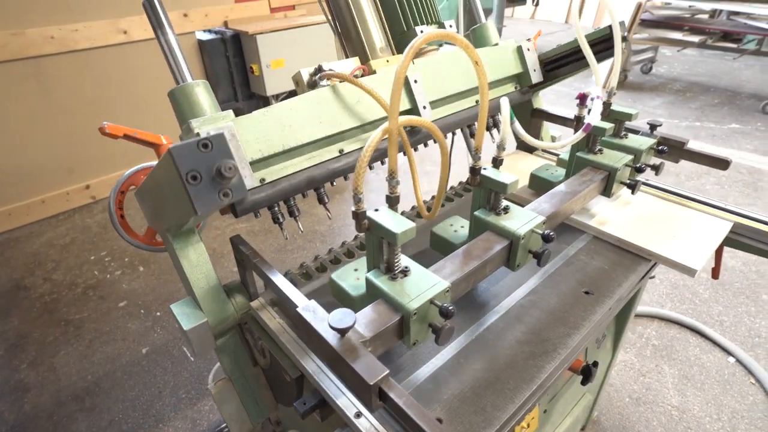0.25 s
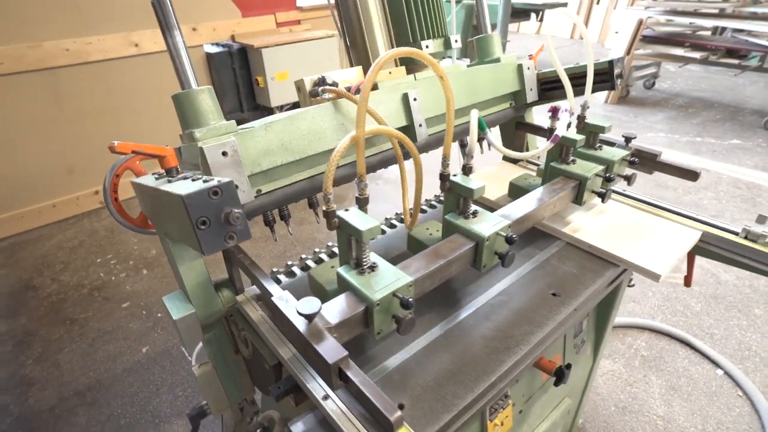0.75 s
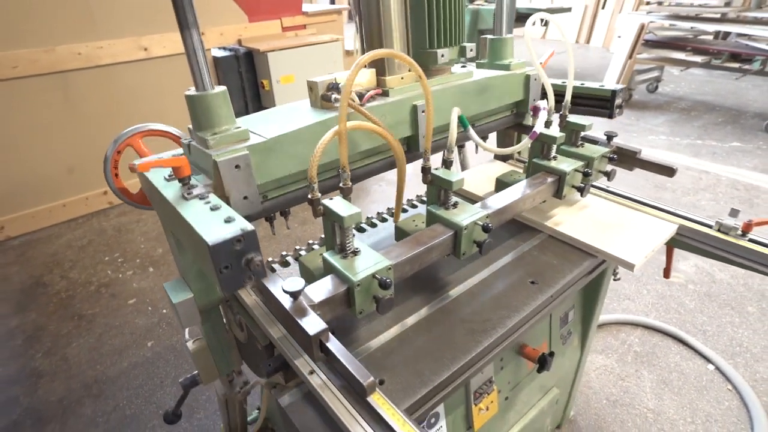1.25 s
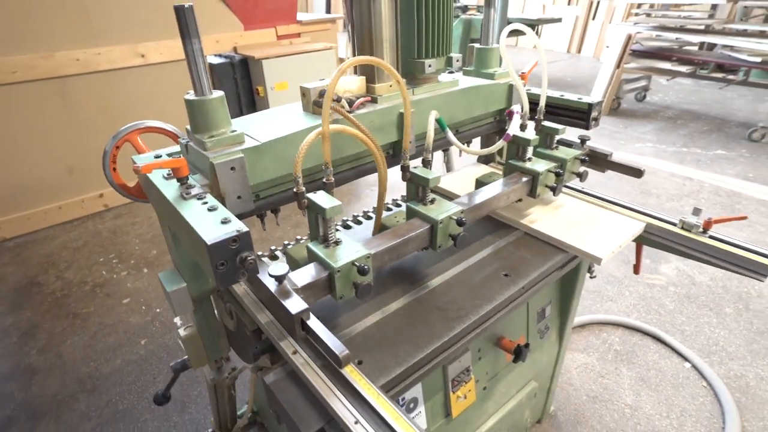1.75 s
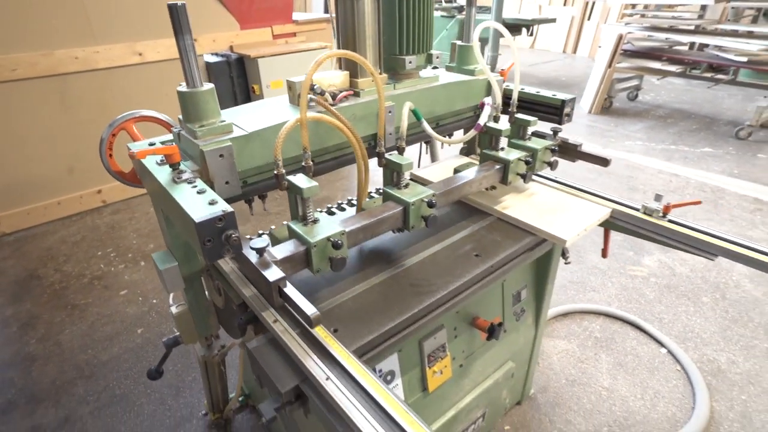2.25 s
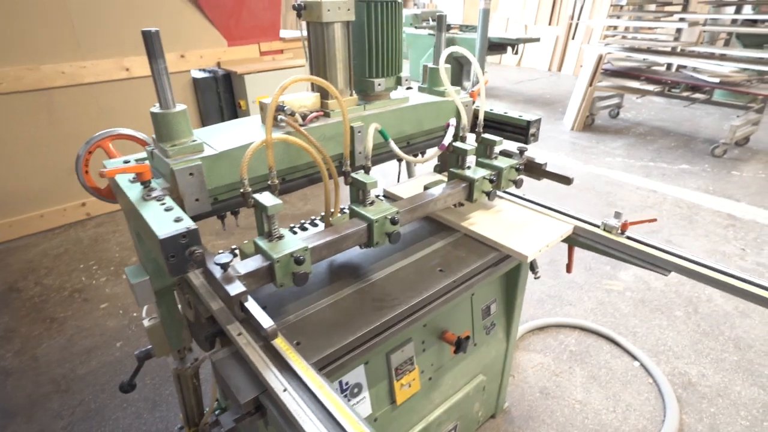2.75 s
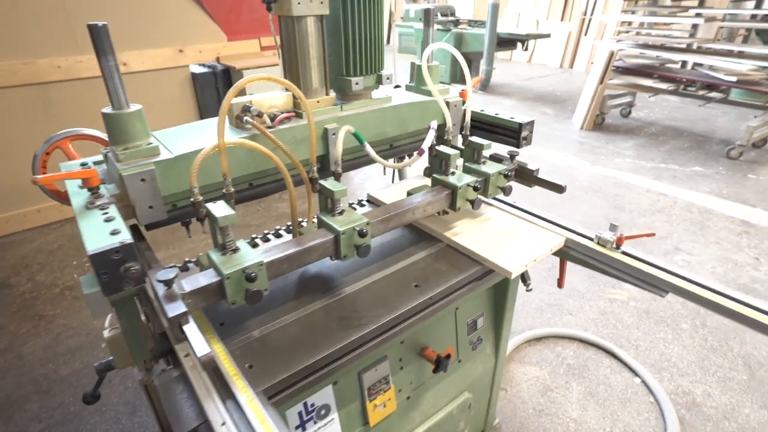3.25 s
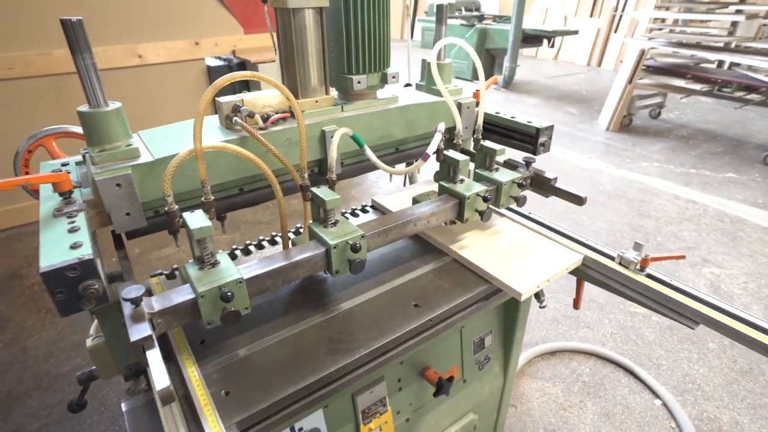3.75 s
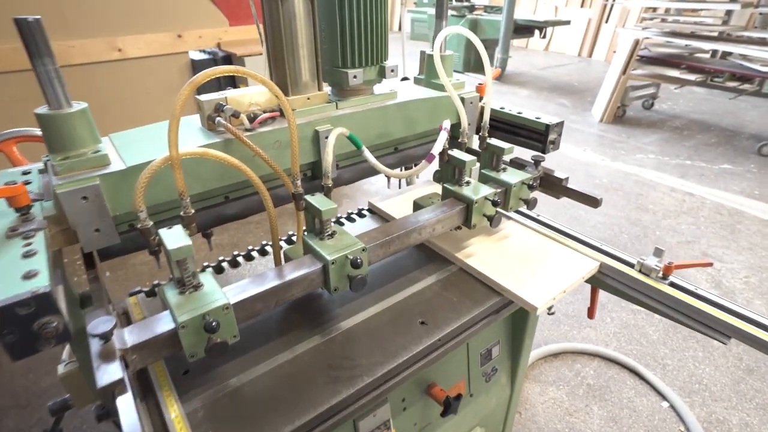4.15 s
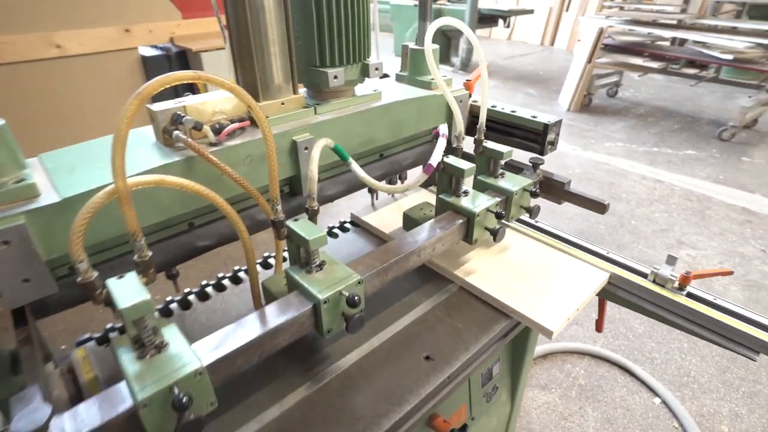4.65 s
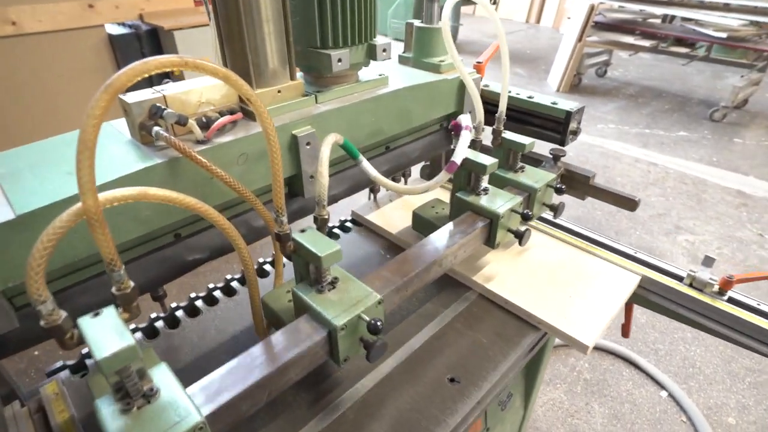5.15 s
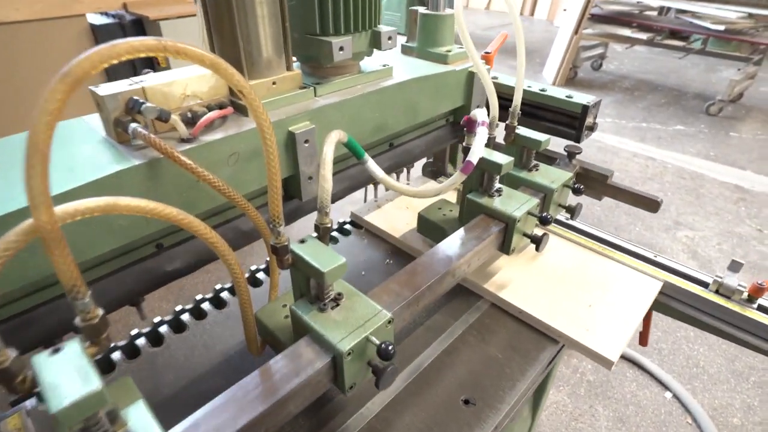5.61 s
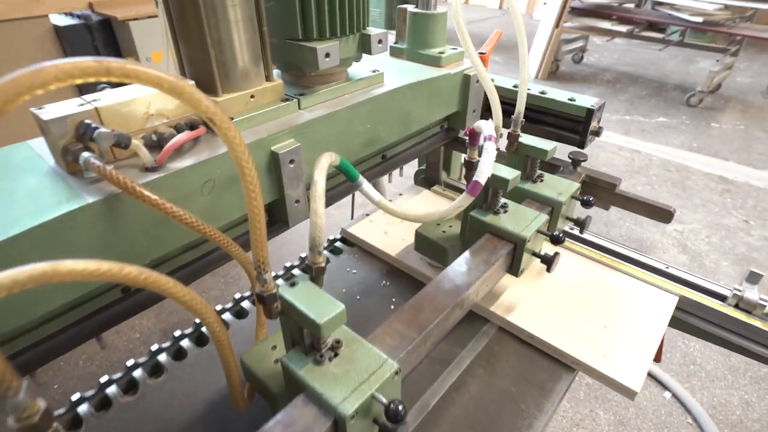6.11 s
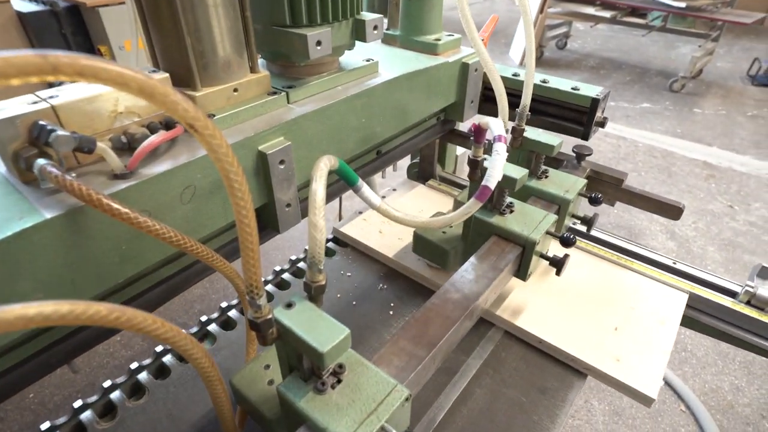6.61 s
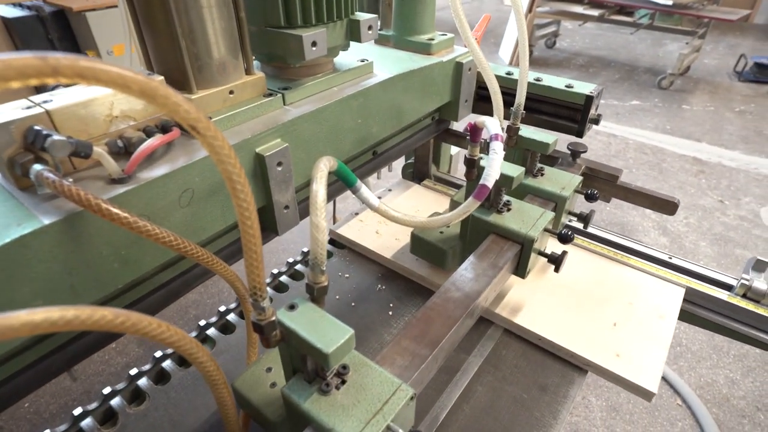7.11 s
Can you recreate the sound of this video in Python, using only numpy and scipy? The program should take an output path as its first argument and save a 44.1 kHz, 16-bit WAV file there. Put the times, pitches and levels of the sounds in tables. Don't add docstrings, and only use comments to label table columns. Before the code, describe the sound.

A quiet, roomy workshop, heard in close stereo. From 0 s a compressor throbs low with chattering casing, small belt squeaks and a thin air leak, fading after about 1.2 s. A ringing valve clack lands at 0.9 s, a crisp latch at 1.3 s, a heavy resonant thump at 1.9 s, with a low bed ring near 2.1 s and fainter clicks at 2.8 and 3.0 s. Air seeps and puffs at 3.2 s; hard knocks at 3.3 and 3.5 s start the motor abruptly. Loud whir, rattling gears, broad hiss and shifting metallic panel rings follow. From 4.65 to 5.4 s the bits cut with a strong, trembling gear whine. A gust marks the return, with lifting gears singing. Power drops at 6.1 s with a clack; high air jets out until about 6.5 s, then the gears coast lower, clattering in bouts, still turning at 7.4 s.

```python
import sys
import numpy as np
from scipy import signal
from scipy.fft import rfft, irfft
from scipy.io import wavfile
from scipy.ndimage import uniform_filter1d

SR = 44100
rng = np.random.default_rng(int(sys.argv[2]) if len(sys.argv) > 2 else 0)


def store_wav(level_fs):
    pcm = np.round(np.clip(np.atleast_2d(level_fs), -1, 1) * 32767)
    wavfile.write(sys.argv[1], SR, pcm.T.astype(np.int16))


def invert_db(x):
    u = np.asarray(x, float) / 20
    return 10 ** u


N = 325139
T = np.arange(N) / SR

ON_S, SETTLE_S, BITE_S, LEAVE_S, VENT_S, OFF_S = 3.336, 3.78, 4.645, 5.415, 6.088, 6.098
# time_s, share_0_to_1
FEED = [(3.9, 0.25), (4.44, 0.2), (4.9, 0.95), (5.1, 1), (5.5, 0.63), (5.75, 0.3), (6.02, 0.25),
        (6.5, 0.64), (6.62, 0.3)]
# time_s, share_of_full_speed
SPEED = [(3.33, .97), (3.5, 1), (6.1, 1), (6.4, .96), (6.6, .92), (6.85, .88), (7.05, .845), (7.38, .765)]
SHAFT_HZ = 49.71

# pitch_hz, likeness_0_to_1
LIKENESS = [(60, 1), (140, 0.98), (350, 0.82), (840, 0.65), (2020, 0.25), (4870, 0.065), (11700, 0.17)]
# pitch_hz, left_over_right_db
MIC_LEAN = [(60, -0.5), (170, 0), (490, 0.5), (1420, 1), (4080, 3.0), (11700, 0.5)]
# time_s, left_over_right_db
MIC_TURN = [(3.33, 0.0), (4.5, 1.5), (5.2, 1.5), (5.8, 3), (7.38, 3)]
EDGE_HZ = 11030

# pitch_hz, level_db_per_hz
ROOM = [(15, -32), (25, 2), (55, -11), (87, -11.5), (217, -17), (287, -12), (361, -24), (390, -12),
        (600, -16.5), (682, -15), (1350, -18.5), (2370, -29), (10900, -32)]
ROOM_DB = -51.5
# time_s, half_length_s, level_db
THROBS = [(0.03, 0.33, -46.5), (.55, .35, -54), (1.39, 0.23, -49.5), (1.87, 0.12, -51)]
# pitch_hz, level_db_per_hz
CHATTER = [(71, -46), (120, -16), (156, 1), (195, -11), (236, 2.5), (340, -11), (394, -8), (505, -9),
           (603, -6), (1290, 2.5), (4000, -14.5), (5200, -44), (8800, -120)]
CHATTER_DB, CHATTER_STOP_S, CHATTER_FALL = -48, 1.25, 22
# time_s, half_length_s, level_db
SQUEAKS = [(.03, .06, -3), (.28, .12, -8), (.52, .03, 1), (.75, .1, -9)]
# pitch_hz, level_db_per_hz
LEAK_HISS = [(1760, -7), (3000, -7.5), (4040, -6.5), (5200, -8), (8190, -0.5), (9170, -5.5), (10100, -4),
             (10900, -10)]
LEAK_DB, LEAK_STOP_S, LEAK_FALL = -46, 1.204, 39
# pitch_hz, time_s, half_length_s, level_db
BED_RINGS = [(75, 2.14, 0.035, -31.5), (67.5, 3.46, 0.058, -41.5), (80, 4.26, .2, -49.5),
             (92, 4.8, .12, -51), (88, 5.5, .08, -36), (89.6, 5.35, 0.1, -37), (94.3, 5.57, 0.13, -36.5),
             (83.6, 6.15, 0.16, -43.5), (253, 5.2, 0.44, -47), (298, 4.9, .2, -48), (325, 5.25, .15, -44),
             (255, 6.3, 0.17, -50.5), (256, 6.68, 0.43, -60.5), (238, .36, .04, -53), (255, .1, .03, -54),
             (85, 5.85, 0.088, -43.5)]

# start_s, peak_db, rise_s, decay_factor, crack_share
BLOWS = [(.878, -18, 0.011, 0.9, .1), (1.283, -24.5, 0.0006, 0.97, 3.8), (1.891, -12, 0.00087, 1, 1),
         (1.951, -24, 0.00048, 0.13, 2.7), (2.784, -35.5, 0.00033, 0.16, 1.9),
         (2.997, -36, 0.0014, 0.37, 0.66), (3.281, -18, 0.00027, 0.13, 2.6),
         (3.333, -10.5, 0.00038, 0.67, 0.46), (3.53, -8, 0.0017, 0.32, 0.33),
         (6.123, -23, 0.0014, 0.43, 0.71), (.892, -20.5, 0.003, .08, .3), (0.889, -21, .0005, .08, 1)]
# pitch_hz, level_db_per_hz
VALVE = [(24, -46), (40, -22), (112, 7), (193, -40), (261, 0), (389, -10), (554, -11.5), (3070, -10.5),
         (3370, -9.5), (10900, -14.5)]
LATCH = [(24, -51), (40, -21), (75, -1), (115, -7.5), (528, -4.5), (734, -18), (996, -6.5), (1550, -19),
         (7670, -30), (10900, -43)]
THUMP = [(18, -48), (30, -40), (69, -2.5), (125, -11), (157, -19), (263, -17.5), (475, -22.5), (593, -20),
         (1520, -28.5), (3590, -37), (4830, -39), (10900, -52)]
START = [(24, -47), (40, -21), (139, -25), (167, -38), (261, -6), (623, -2.5), (668, -12), (845, 3.5),
         (2010, -8), (10900, -10)]
SWITCH = [(120, -61), (200, -34), (257, -23), (667, -13), (725, -26), (1160, -5.5), (1390, -10.5),
          (10900, -10)]
TICK = [(300, -38), (2000, -6), (5000, 6), (8000, 0), (11500, -9)]
KNOCK = [(80, -8), (260, -12), (600, -15), (1300, -8), (3000, -52)]
# pitch_hz, time_to_fall_60_db_s
TAIL = [(60, 0.99), (150, 1), (500, 1), (2000, 0.69), (5000, 0.68), (11000, 0.71)]
# pitch_hz, level_db, time_to_fall_60_db_s
VALVE_RING = [(267, 7, .6), (300, -2, .5), (1030, -4, .2), (3420, 5, .12), (3465, -1, .9), (3490, -8, .6),
              (3967, 0, .14), (4630, -3, .35), (5410, -4, .3), (5600, -5, .25), (7354, -7, .3),
              (8300, -5, .3), (8398, -6, .3)]
LATCH_RING = [(80.7, -4, .9), (480, -2, .3), (560, 0, .4), (1900, -3, .08), (2600, -4, .04), (5850, -9, .1),
              (5600, -9, .1), (6100, -10, .08)]
THUMP_RING = [(72.0, 6.5, 1), (89.9, 5.5, 0.84), (120, -6, 0.95), (202, 2, 0.37), (268, 4.5, 0.504),
              (343, -5, 0.23), (370, -4, 0.49), (420, -2, 0.3), (613, -0.5, 0.3), (694, -6, 0.35),
              (1140, 4, 0.044), (2780, -2.5, 0.04)]
SWITCH_RING = [(1860, 3.7, 0.071), (3120, 3.8, 0.031)]
BLOW_KINDS = [
    (VALVE, VALVE_RING), (LATCH, LATCH_RING), (THUMP, THUMP_RING),
    (TICK, [(5020.0, 3.0, .03), (6930.0, -2.0, .02)]), (LATCH, []), (KNOCK, [(1284.0, 1.3, 0.17)]),
    (SWITCH, SWITCH_RING), (START, []), (START, []), (KNOCK, [(250.0, 9.6, 0.11)]),
    (VALVE, [(3460.0, 13.5, 0.11), (4600.0, -4.0, .08)]), (VALVE, [])]
RING_DB, SLOW_DB_PER_MS = -4.5, -0.65

# pitch_hz, level_db_per_hz
RUMBLE = [(18, -52), (30, -48), (86, 5), (106, -4), (129, -7), (195, -6.5), (225, -8.5), (258, -5.5),
          (450, -10.5), (580, -26), (990, -120)]
# time_s, half_length_s, level_db
ROCKS = [
    (3.55, 0.15, -43.5),
    (6.05, 0.088, -46),
]
BED_DB, BED_MOTOR_DB, BED_FEED_DB = -63.5, 11.5, 15

PILOT_S, PILOT_DB, PILOT_RISE, OPEN_S, OPEN_DB = 3.175, -45.5, 67, 3.28, -31
# pitch_hz, level_db_per_hz
HISS = [(1940, -29), (3200, -7), (3350, -9), (3600, -3), (3990, -9), (4330, 0.5), (6270, 2), (7000, -1.5),
        (9100, -18), (15400, -120)]
FIZZ = [(6000, -20), (7200, -1.5), (8500, -0.5), (9500, 0.5), (11000, 0.5)]
JET = [(5500, -40), (7000, -14), (8400, -7), (9000, -2), (9600, 1), (10200, -1), (11000, -2)]
HISS_DB, HISS_FEED_DB, HISS_OFF_DB, HISS_END_DB = -31, 2.5, -34.5, -38.5
FIZZ_DB, FIZZ_FEED_DB, FIZZ_END_DB = -36.5, 7.5, -47.5
# time_s, half_length_s, level_db
GUSTS = [
    (3.42, 0.088, -27),
    (5.41, 0.13, -24.5),
    (5.66, 0.09, -36),
    (6.03, 0.086, -30),
]
VENT_DB, VENT_RISE, VENT_TOP_S, VENT_FALL, VENT_END_DB, VENT_POP_DB = -30, 4.8, 6.477, 42, -58, -31

# pitch_hz, level_db_per_hz
RATTLE = [(150, -27.5), (250, -32), (424, -23.5), (567, -9.5), (638, -10), (801, -14.5), (862, -7),
          (927, -5.5), (1020, -12), (1240, -6.5), (1540, -5), (1820, -15.5), (2200, -15), (2860, -17),
          (4840, -120)]
SHELL = [(1000, -41), (1700, -11), (1900, -6.5), (2360, -3.5), (2630, -1.5), (3230, -8), (3340, -15),
         (3550, -13), (4200, -14.5), (5460, -42), (9240, -120)]
RATTLE_DB, RATTLE_DEEP_DB, RATTLE_COAST_DB, RECOVER_DB, RECOVER_S = -22, -4, -29.5, -11, 0.28
SHELL_DB, SHELL_DEEP_DB, SHELL_FEED_DB, SHELL_COAST_DB, SHELL_SAG = -29.5, 9.5, -3, -35, 2.6
RING_OUT_DB, RING_OUT_FALL = -16, 210
# time_s, half_length_s, level_db
JOLTS = [
    (3.355, 0.025, -25.5),
    (3.45, 0.03, -27.5),
    (5.66, 0.11, -24),
]
TONES_HZ = [609.3, 884.5, 932]
# time_s, half_length_s, level_db
LOW_RING = [(3.48, 0.04, -31), (3.66, 0.043, -37), (3.785, 0.018, -27), (3.86, 0.05, -28.5),
            (3.95, 0.084, -26), (4.08, .05, -31.5), (4.21, 0.042, -21), (4.33, 0.12, -27),
            (4.45, 0.062, -25), (4.53, 0.019, -21.5), (4.63, 0.041, -25), (4.69, 0.016, -35),
            (4.8, 0.018, -31.5), (4.9, 0.042, -36.5), (5.02, 0.082, -27.5), (5.28, 0.11, -30.5),
            (5.42, 0.029, -34), (5.5, .05, -39), (5.61, 0.056, -24.5), (5.68, .04, -26), (5.77, 0.086, -18),
            (5.84, 0.037, -24), (5.9, .018, -26), (5.95, 0.019, -22.5), (5.995, 0.0092, -25),
            (6.028, .016, -22), (6.075, 0.042, -24)]
MOTOR_TONE = [(3.65, 0.45, -24), (4.15, 0.14, -39), (4.66, 0.1, -36), (5.1, 0.34, -32.5),
              (5.52, 0.18, -26.5), (5.95, 0.73, -28.5)]
UPPER_RING = [(3.8, 0.2, -44), (4.15, 0.13, -29), (4.32, 0.11, -28), (4.518, 0.15, -27.5),
              (4.85, 0.13, -34), (5.1, 0.34, -31.5), (5.6, 0.098, -25.5), (5.84, 0.12, -23.5),
              (6.0, 0.11, -26.5)]
RING_REST_DB = -40.5
# pitch_hz, level_db
SPINDLES = [(543.7, -47.5), (834.4, -42), (1050, -45.5), (1287, -42), (1432, -42.5), (1604, -42),
            (1680, -43.5)]
# pitch_hz, time_s, half_length_s, level_db
LIFTING = [(1195, 5.2, .16, -31), (1287, 6.2, 0.15, -35), (1262, 6.7, 0.16, -32.5),
           (1380, 5.57, 0.076, -36.5), (1426, 5.75, 0.13, -28.5), (1430, 6.02, 0.083, -31),
           (1495, 5.3, 0.085, -39), (1600, 5.52, 0.075, -28.5), (1590, 6.5, 0.089, -32),
           (3620, 4.47, 0.051, -39), (1057, 4.15, 0.2, -33), (543, 4.08, 0.24, -42)]
# time_s, half_length_s, level_db
RETURN_RING = [(5.55, 0.13, -31), (5.98, 0.22, -31)]
RETURN_HZ = 1552
# pitch_hz, half_width_hz
PANELS_HZ = [(2296, 86), (2586, 45.5), (3135, 40), (2700, 54), (2390, 22), (2150, 55)]
# time_s, half_length_s, level_db
LOW_PANEL = [(3.36, 0.13, -29.5), (3.77, .04, -25.5), (3.845, .03, -22.5), (3.95, 0.093, -26.5),
             (4.09, 0.055, -21), (4.2, 0.11, -26), (4.96, 0.27, -29), (5.8, .03, -24.5), (5.89, .025, -23),
             (5.96, .025, -21), (6.03, .06, -24.5)]
MID_PANEL = [(3.38, .04, -28), (3.75, 0.26, -29.5), (3.88, 0.025, -24), (3.95, 0.041, -26),
             (4.03, 0.039, -25), (4.1, .04, -26.5), (4.2, .04, -22), (4.3, 0.071, -19), (4.41, 0.027, -23),
             (4.5, .06, -25), (4.6, .035, -21), (5.8, 0.15, -30)]
TOP_PANEL = [(4.15, 0.15, -33), (4.5, 0.24, -32.5)]
SIDE_PANEL = [(4.1, .03, -22), (4.26, 0.15, -22), (4.38, 0.049, -25), (4.55, 0.12, -31), (5.5, 0.063, -31),
              (5.62, 0.025, -25), (5.77, 0.043, -29), (5.855, 0.027, -23)]
COVER_PANEL = [(4.1, 0.05, -29), (4.55, 0.15, -31), (4.95, 0.091, -34.5), (5.35, 0.11, -36),
               (5.95, 0.046, -30)]
GUARD_PANEL = [(3.93, 0.073, -30), (4.08, 0.045, -35), (5.9, .1, -32)]
PANEL_REST_DB = -49

# shaft_order (multiple of shaft speed), level_db
WHINE = [(4, -27), (40, -19), (42, 0), (43, -13), (44, -15), (48, -11), (50, -18), (62, -18), (63, -14),
         (65, -22), (84, -23), (88, -23), (105, -18), (126, -20), (147, -19), (168, -19), (189, -18),
         (210, -19)]
# time_s, half_length_s, level_db
WHINE_SWELLS = [
    (4.58, .04, -38),
    (5.5, 0.054, -35),
]
# time_s, share
WHINE_FLUTTER = [(4.65, .04), (4.85, .1), (4.95, .3), (5.1, .2), (5.2, .36), (5.4, .33)]
# time_s, level_db
WHINE_LOAD = [(4.65, 2), (4.8, 1.5), (4.95, -0.5), (5.1, 0), (5.18, 1.5), (5.4, -0.5)]
WHINE_DB, WHINE_RISE_S, WHINE_FALL = -23, 0.043, 200.0
# shaft_order, level_db
GUARD_ORDERS = [(73, -45.5), (79, -52), (96, -51), (145, -52)]
GUARD_HZ, GUARD_DB = 3660, -40.5

# shaft_order, level_db
COAST = [(11, -52.5), (13, -50), (14, -48.5), (16, -50.5), (18, -45.5), (20, -54), (22, -53), (23, -52),
         (25, -52), (27, -47.5), (30, -43)]
# pitch_hz, width_hz, level_db
HOUSING_PEAKS = [(950, 39, 19), (519, 64, 3.3), (430, 110, 1.7), (720, 38, 2.2), (1230, 260, 1.3)]
# time_s, half_length_s, level_db
BOUTS = [(6.14, 0.034, -40), (6.22, 0.046, -41), (6.4, 0.043, -39), (6.46, 0.043, -29.5),
         (6.53, 0.058, -33), (6.7, 0.018, -36), (6.82, 0.031, -32), (6.895, .035, -25.5),
         (6.98, .04, -27.5), (7.04, .04, -31), (7.1, .03, -29), (7.15, 0.025, -23.5), (7.22, .03, -31),
         (7.3, .025, -37)]
# time_s, pitch_hz
RING_DRAG = [(6.1, 938), (6.14, 962), (6.26, 924), (6.33, 932), (6.37, 965), (6.58, 916), (6.62, 950),
             (6.72, 936), (6.77, 948), (6.86, 945), (7.04, 935), (7.09, 946.5), (7.26, 918), (7.37, 907)]


def evened(x):
    return x / np.sqrt(np.mean(x ** 2) + 1e-20)


def read(points, hz):
    f, value = np.transpose(points)
    return np.interp(np.log(hz + 1), np.log(f + 1), value)


def curves(rows):
    return np.interp(T, *np.transpose(rows))


def between(start, end):
    is_open = (T >= start) & (T <= end)
    return uniform_filter1d(is_open * 1., size=300, mode="nearest")


def after(s):
    return np.maximum(T - s, 0)


def swells(rows, rest_db=-80):
    bells = sum(invert_db(2 * db) * np.exp(-2 * ((T - s) / (half + 1e-3)) ** 2) for s, half, db in rows)
    return np.sqrt(invert_db(2 * rest_db) + bells)


def wander(hz):
    smooth = signal.butter(2, hz, fs=SR, output="sos")
    return evened(signal.sosfilt(smooth, rng.standard_normal(N)))


def noise(shape, patchy_db, band=(0, 20000), size=512, t60=None, length=N):
    frames, hz = length * 4 // size + 5, np.fft.rfftfreq(size, 1 / SR)
    a, b, c, d, patches = rng.standard_normal((frames, len(hz), 5)).T
    patches = uniform_filter1d(patches, size=6, axis=0)
    patches = evened(uniform_filter1d(patches, size=16, axis=1))
    same = read(LIKENESS, hz)[:, None]
    left = a + 1j * b
    right = same * left + np.sqrt(1 - same ** 2) * (c + 1j * d)
    f = np.transpose(shape)[0]
    gain = invert_db(read(shape, hz)) * (hz > .8 * f[0]) * (hz < 1.1 * f[-1])
    z = np.array([left, right]) * gain[:, None] * invert_db(patchy_db * patches)
    overlap = size * 3 // 4
    scale = np.sqrt(np.mean(signal.istft(z, nperseg=size, noverlap=overlap)[1] ** 2))
    inside = (hz >= band[0]) & (hz <= band[1])
    scale *= np.sqrt((gain[inside] ** 2).sum() / (gain ** 2).sum())
    if t60 is not None:
        fall_db = -60 * np.arange(frames) * size / 4 / SR / t60(hz)[:, None]
        z *= invert_db(fall_db) + invert_db(-30.5 + 0.18 * fall_db)
    return signal.istft(z, nperseg=size, noverlap=overlap)[1][:, :length] / scale


def tone(hz, fuzz, width_hz, lag):
    fuzzy = (wander(width_hz) + 1j * wander(width_hz)) / np.sqrt(2)
    wobble = np.sqrt(1 - fuzz ** 2) + fuzz * fuzzy
    turn = wobble * np.exp(2j * np.pi * (np.cumsum(hz * np.ones(N)) / SR + rng.random()))
    return np.sqrt(2) * np.array([turn.real, (turn * np.exp(-1j * lag)).real])


def room_floor():
    duck_db = np.interp(T, [3.3, 3.6], [0, -9.0])
    return invert_db(ROOM_DB + duck_db) * noise(ROOM, 1.7, size=2048)


def compressor():
    drone = swells(THROBS) * (tone(80.5, .12, 8, .3) + invert_db(-9) * tone(161, .4, 6, .3))
    squeak = invert_db(-10) * tone(2012.0, 0.4, 13.0, 0.62) * between(0, 0.65)
    squeak += swells(SQUEAKS) * tone(1305.0, 0.23, 13.0, 0.47)
    level = invert_db(CHATTER_DB - CHATTER_FALL * after(CHATTER_STOP_S))
    return drone + level * (noise(CHATTER, 1.0, (700, 2300)) + squeak)


def leak():
    return invert_db(LEAK_DB - LEAK_FALL * after(LEAK_STOP_S)) * noise(LEAK_HISS, 1.4, (4000, 11000))


def bed_rings():
    return sum(swells([bell]) * tone(hz, 0.53, 7.0, -.25) for hz, *bell in BED_RINGS)


def blows():
    out, t = np.zeros((2, N + SR)), T[:SR]
    low_pass = signal.butter(2, 250.0, fs=SR, output="sos")
    for (s, db, rise, decay, crack), (shape, modes) in zip(BLOWS, BLOW_KINDS):
        size = 1024 if decay > .6 else 256
        burst = noise(shape, 0.78, size=size, t60=lambda hz: decay * read(TAIL, hz) + 0.036, length=SR)
        ring = np.zeros(SR)
        for hz, mode_db, t60 in modes:
            ring += invert_db(mode_db - 60 * t / t60) * np.sin(2 * np.pi * hz * t)
        sound = burst + invert_db(RING_DB + SLOW_DB_PER_MS * rise * 1e3) * ring
        bass = signal.sosfilt(low_pass, sound)
        strike = 1 + crack * np.exp(-t / 0.0015)
        steel = (sound - bass) * strike * np.tanh(t / rise) ** 2
        heavy = bass * np.tanh(t / (rise + 0.018))
        at = round(s * SR)
        out[:, at:at + SR] += invert_db(db - 12.0) * (steel + heavy)
    return out[:, :N]


def bed():
    rumble_db = BED_DB + BED_MOTOR_DB * between(SETTLE_S, 8) + BED_FEED_DB * curves(FEED)
    rumble_db -= 17.6 * after(OFF_S)
    return between(2.1, 8) * swells(ROCKS, rumble_db) * invert_db(-0.5) * noise(RUMBLE, 2.7, (50, 130), size=2048)


def pilot_puff():
    puff_db = np.where(T < OPEN_S, PILOT_DB + PILOT_RISE * after(PILOT_S), OPEN_DB)
    gate = between(PILOT_S, ON_S) * np.minimum(after(PILOT_S) / 0.017, 1)
    return gate * invert_db(puff_db) * noise(SWITCH, 0.65, (1500, 11000))


def valve_hiss():
    feed, powered, vented = curves(FEED), between(ON_S, OFF_S), between(OFF_S, 8)
    emptying_db = np.interp(T, [VENT_TOP_S, VENT_TOP_S + 0.22], [HISS_OFF_DB, HISS_END_DB])
    flow = powered * swells(GUSTS, HISS_DB + HISS_FEED_DB * feed) + vented * invert_db(emptying_db)
    hiss = flow * noise(HISS, 1.35, (4000, 7000))
    hiss += (powered + vented) * invert_db(-42.5) * tone(6400.0, 0.91, 120.0, 0.69)
    spray = powered * swells([(3.38, 0.086, -30)], FIZZ_DB + FIZZ_FEED_DB * feed)
    spray += vented * swells([(6.4, 0.12, -34.5)], FIZZ_END_DB)
    return hiss + spray * invert_db(2.5) * noise(FIZZ, 0.58, (8000, 11000))


def housing():
    depth = np.interp(T, [SETTLE_S, BITE_S, LEAVE_S + 0.074, OFF_S], [0, 1, 1, 0])
    free, jolts = between(OFF_S, 8), swells(JOLTS)
    powered = between(ON_S, OFF_S) + free * invert_db(RING_OUT_DB - RING_OUT_FALL * after(OFF_S))
    turns = np.cumsum(curves(SPEED)) * SHAFT_HZ / SR
    beat = 1 + 0.028 * np.cos(2 * np.pi * turns) + 0.084 * wander(30.0)
    rattle = powered * np.hypot(invert_db(RATTLE_DB + RATTLE_DEEP_DB * depth), jolts)
    rattle += free * invert_db(RATTLE_COAST_DB + RECOVER_DB * np.exp(-after(OFF_S) / RECOVER_S))
    shell_db = SHELL_DB + SHELL_DEEP_DB * depth + SHELL_FEED_DB * curves(FEED)
    shell = powered * np.hypot(invert_db(shell_db), jolts * (T < SETTLE_S))
    shell += free * invert_db(SHELL_COAST_DB - SHELL_SAG * after(OFF_S))
    rattle = rattle * invert_db(-3.0) * noise(RATTLE, 1.23, (1000, 1800), size=1024)
    shell = shell * invert_db(-3.5) * noise(SHELL, 1.9, (1800, 3300))
    lean = invert_db(np.array([[.5], [-.5]]) * curves(MIC_TURN))
    struck = beat * (rattle + shell + powered * panels())
    return lean * (struck + powered * (motor_and_rings() + gear_songs()) + whine() + free * coasting())


def panels():
    bells = (LOW_PANEL, MID_PANEL, TOP_PANEL, SIDE_PANEL, COVER_PANEL, GUARD_PANEL)
    out = 0
    for rows, (hz, width) in zip(bells, PANELS_HZ):
        out = out + swells(rows, PANEL_REST_DB) * invert_db(-3.5) * tone(hz, min(width / 60.0, .9), width, 0.4)
    return out


def motor_and_rings():
    low, motor, upper = (swells(rows, RING_REST_DB) for rows in (LOW_RING, MOTOR_TONE, UPPER_RING))
    sag = np.interp(T, [4.0, 6.1], [1.008, .992])
    run_up = 1 - .1 * np.exp(-after(ON_S) / 0.04026)
    motor = motor * np.minimum(after(ON_S) / 0.12, 1)
    out = low * tone(TONES_HZ[0] * sag, 0.35, 21.7, 0.68)
    out += motor * tone(TONES_HZ[1] * run_up, 0.22, 9.0, 0.78)
    return out + upper * tone(TONES_HZ[2] + 3, 0.18, 13.0, 0.84)


def gear_songs():
    out = swells(RETURN_RING) * tone(RETURN_HZ, 0.83, 27.0, 0.4)
    for hz, db in SPINDLES:
        out += invert_db(db + 1.9 * wander(1.06)) * tone(hz, 0.61, 6.6, rng.uniform(-0.24, 1.0))
    for hz, *bell in LIFTING:
        out += swells([bell]) * tone(hz, 0.35, 8.7, 0.63)
    return out


def whine():
    load = np.clip(.5 + (T - BITE_S) / WHINE_RISE_S, 0, 1) * invert_db(WHINE_DB - WHINE_FALL * after(LEAVE_S))
    turn = 2 * np.pi * (SHAFT_HZ * T + .08 * wander(6.0))
    throb = abs(1 + curves(WHINE_FLUTTER) * (np.cos(turn) + 0.17 * wander(30.0)))
    load = np.hypot(load * invert_db(curves(WHINE_LOAD)) * throb, swells(WHINE_SWELLS))
    shaft_hz = SHAFT_HZ * (.9993 + .001 * wander(7.0) + .003 * np.exp(-after(BITE_S) / .25))
    out = 0
    for order, db in WHINE:
        level = invert_db(db + order / 140 * wander(4))
        out = out + level * tone(order * shaft_hz, .17, 40, rng.uniform(-1, 1))
    return load * out


def guard():
    out = invert_db(GUARD_DB) * tone(GUARD_HZ, 1.0, 130.0, 0.93)
    for order, db in GUARD_ORDERS:
        out += invert_db(db + 3.1 * wander(4)) * tone(order * SHAFT_HZ, .4, 24.0, .6)
    return between(BITE_S, LEAVE_S) * out


def exhaust():
    vent_db = VENT_DB + VENT_RISE * after(OFF_S) - (VENT_RISE + VENT_FALL) * after(VENT_TOP_S)
    vent = invert_db(vent_db) + swells([(VENT_S + 0.0049, 0.008, VENT_POP_DB)], VENT_END_DB)
    jet = between(VENT_S, 8) * vent * invert_db(2.5) * noise(JET, 1.6, (8500, 11000))
    return jet + swells([(6.4, 0.2, -44)]) * tone(5700.0, 0.55, 30.0, 0.9)


def coasting():
    shaft_hz, out = SHAFT_HZ * curves(SPEED), 0
    clatter = swells(BOUTS, -42)
    for order, db in COAST:
        hz = order * shaft_hz
        lifts = [invert_db(peak_db) / (1 + (2 * (hz - f) / w) ** 2) for f, w, peak_db in HOUSING_PEAKS]
        lift = lifts[0] * clatter * invert_db(25.0) + sum(lifts[1:])
        level = invert_db(db) * (0.18 + lift) * invert_db(2.0 * wander(2.8))
        out = out + level * tone(hz, 0.57, 11.0, rng.uniform(-0.44, .5))
    out = out + clatter * invert_db(-0.5) * tone(curves(RING_DRAG), 0.45, 20.0, 0.47)
    return np.clip(after(OFF_S) / 0.05, 0, 1) * out


def scene():
    background = room_floor() + compressor()
    air = leak() + pilot_puff() + valve_hiss() + exhaust()
    machine = bed_rings() + blows() + bed() + housing() + guard()
    return background + air + machine


def top_cut(x):
    return signal.sosfilt(signal.butter(12, 12320, fs=SR, output="sos"), x)


def record(dry):
    wide = np.pad(dry, ((0, 0), (4096, 4096)), mode="reflect")
    hz, side = np.fft.rfftfreq(wide.shape[1], 1 / SR), np.array([[.5], [-.5]])
    response = invert_db(side * read(MIC_LEAN, hz)) * np.exp(-1j * side * 0.23 / (1 + (hz / 280.0) ** 2))
    response *= (hz < EDGE_HZ) * hz ** 4 / (hz ** 4 + 22.0 ** 4)
    mix = irfft(rfft(wide) * response, wide.shape[1])[:, 4096:-4096]
    return top_cut(mix)


dry = scene()
out = record(dry)
store_wav(out)
```